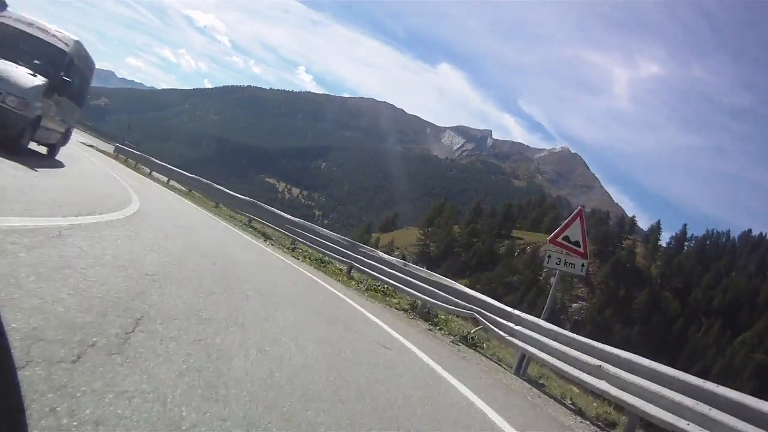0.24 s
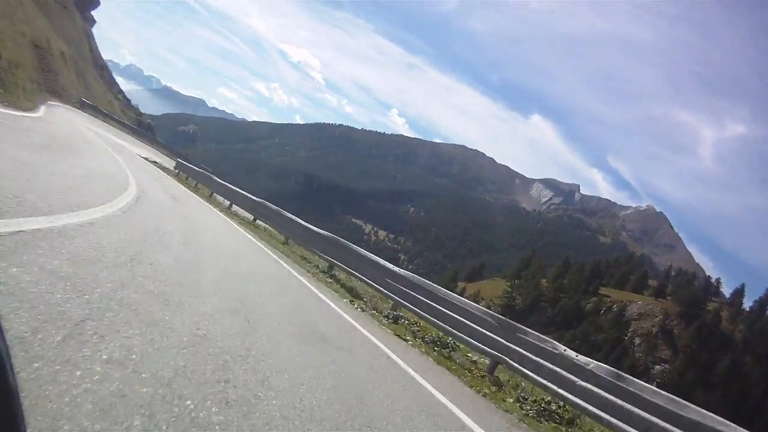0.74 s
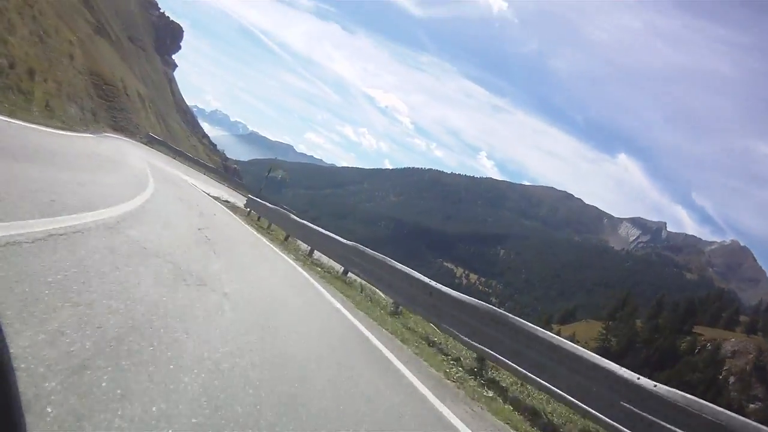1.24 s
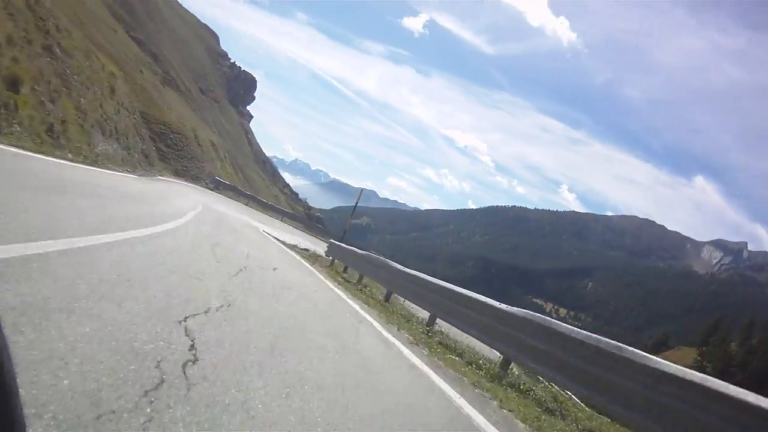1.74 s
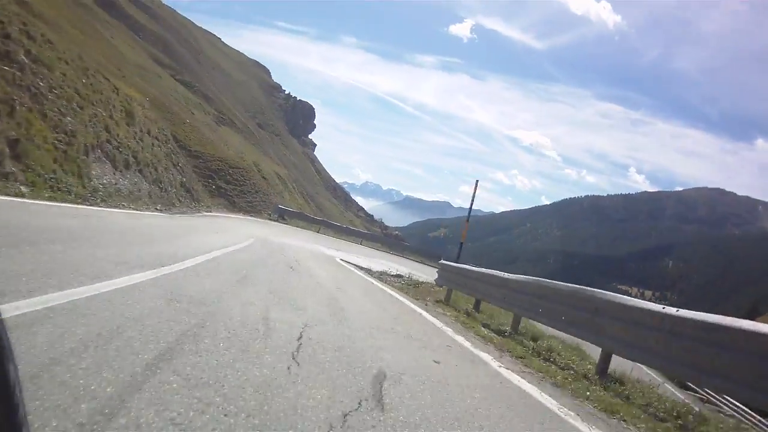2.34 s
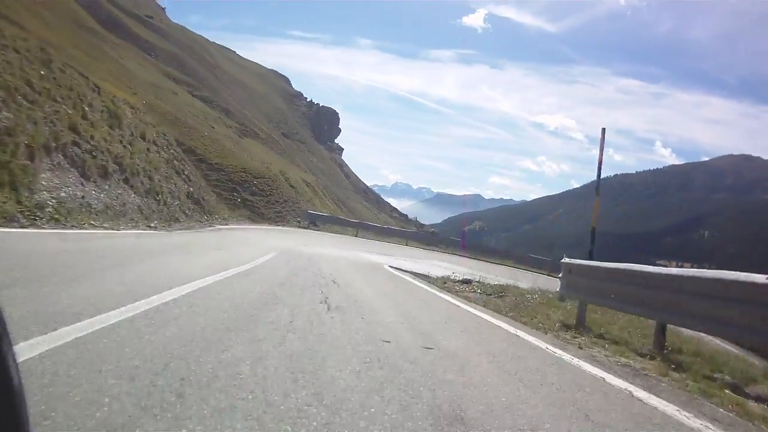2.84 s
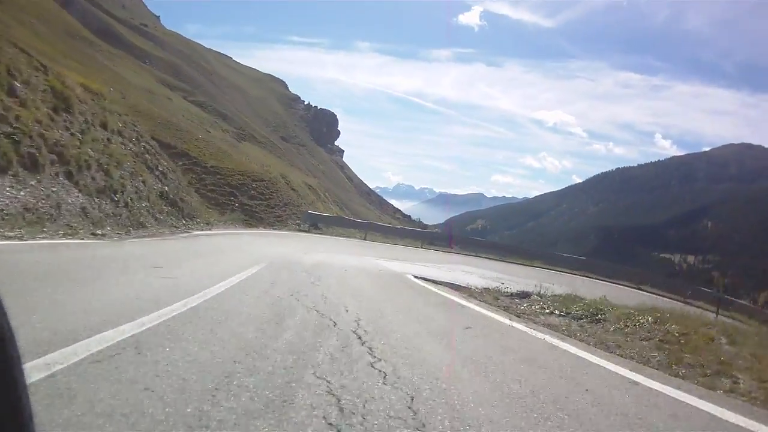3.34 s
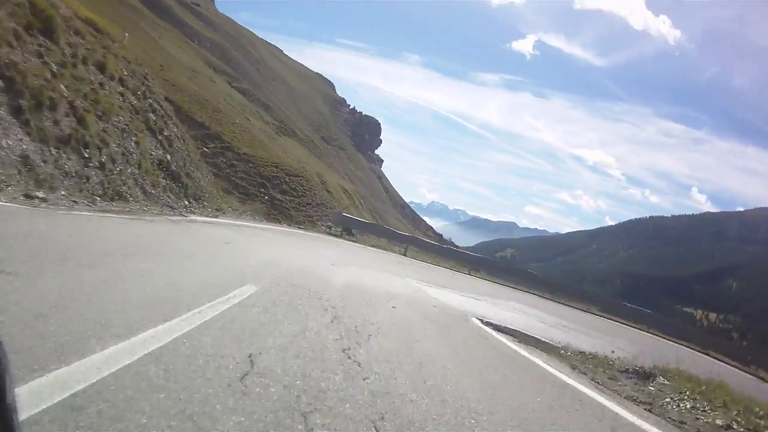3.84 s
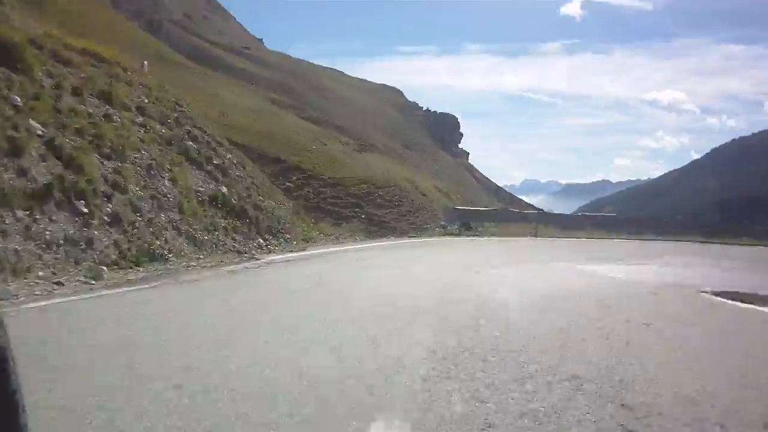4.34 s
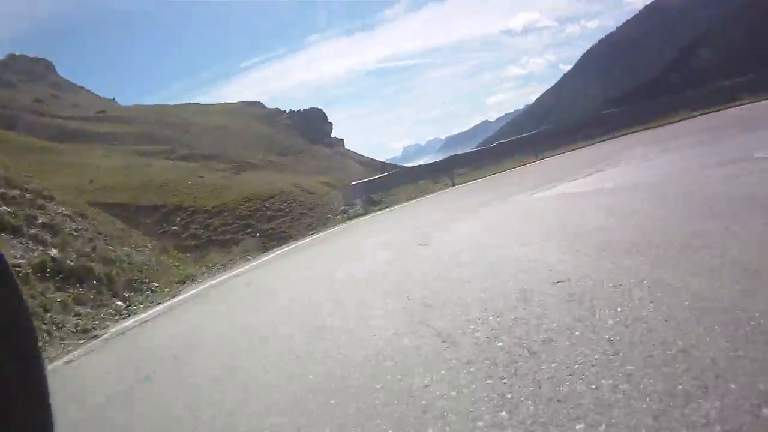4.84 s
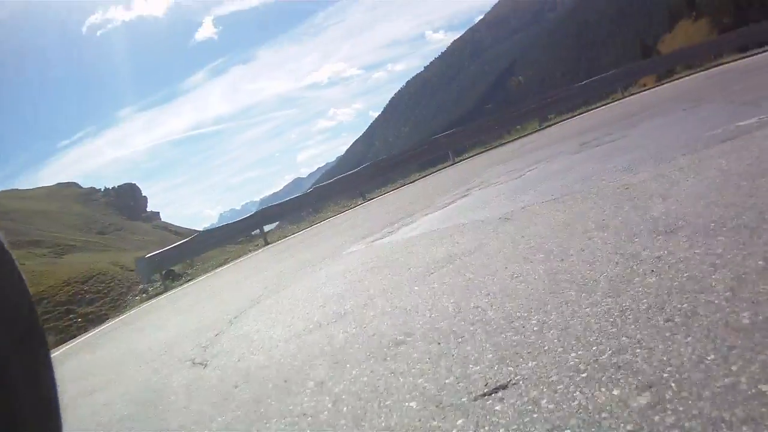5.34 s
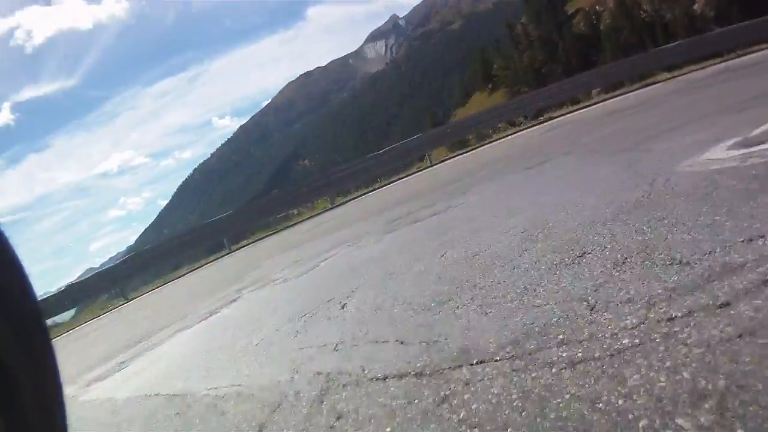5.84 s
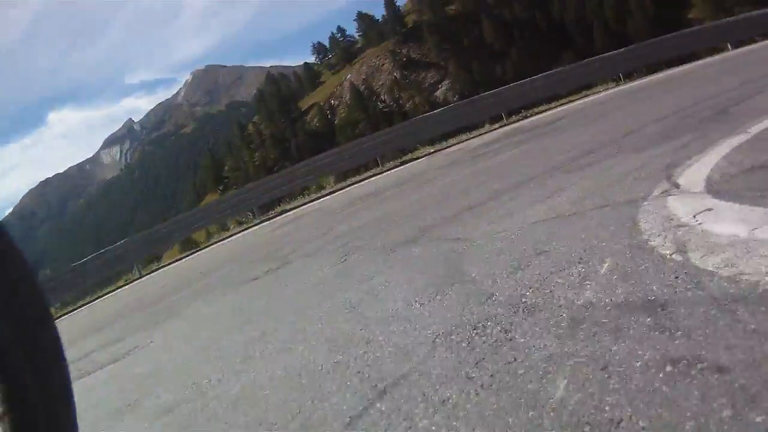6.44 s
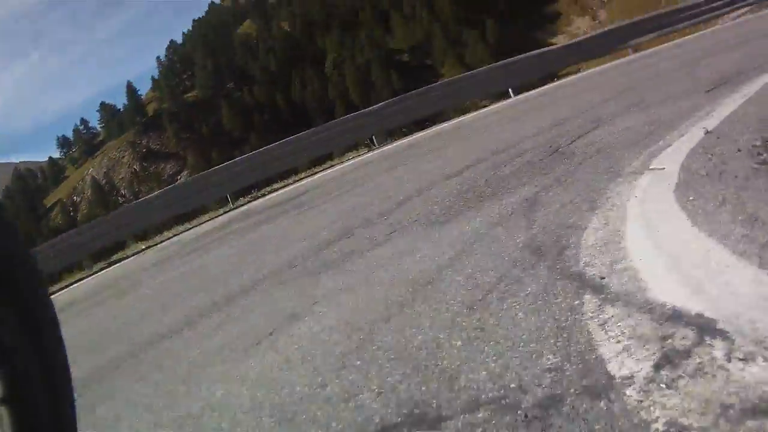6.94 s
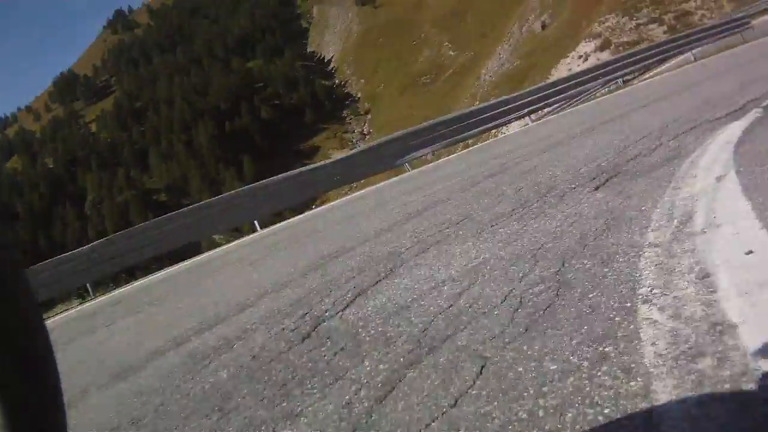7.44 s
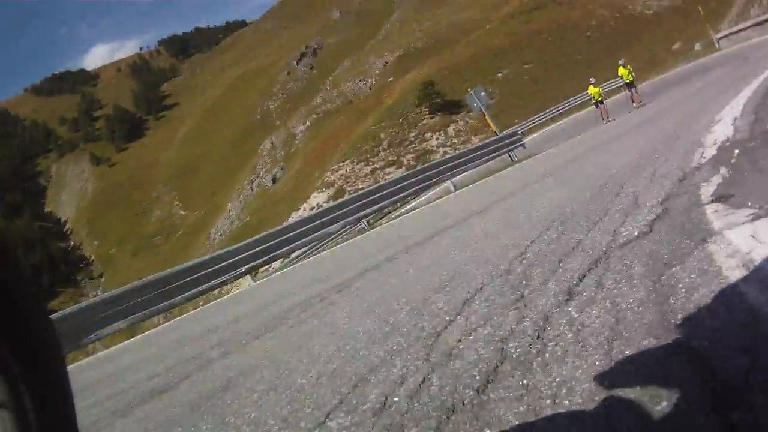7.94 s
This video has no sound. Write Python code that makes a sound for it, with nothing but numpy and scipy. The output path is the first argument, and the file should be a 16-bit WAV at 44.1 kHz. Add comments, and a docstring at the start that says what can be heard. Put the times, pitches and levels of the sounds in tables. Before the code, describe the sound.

Close, bassy motorcycle sound from a microphone mounted on the bike outdoors. A steady twin throb with gear whine and mechanical clatter is joined by a passing van's tyre rush. One brief rev flare follows, then a long descending deceleration into separate low thuds. Wind and road noise gradually ease as the bike slows, before a light throttle and a final rattly pull.

```python
"""A twin-cylinder motorcycle throbs on board, and at once a van sweeps past the other way.
The rider blips the throttle for a downshift, engine-brakes to a low chug, then opens up again.
Crank-locked pulses, noise puffs and shaft tones, shaped by resonances, make the engine.
Filtered noise makes the wind, the tyres and the loose fittings; the van adds a sagging drone."""
import sys
import numpy as np
from scipy import signal
from scipy.io import wavfile
from scipy.ndimage import map_coordinates

SR = 44100
rng = np.random.default_rng(int(sys.argv[2]) if len(sys.argv) > 2 else 0)


def output_pcm(signal):
    """Save a mono or channel-first signal as 16-bit PCM at the path in sys.argv[1].

    Samples are clipped to [-1, 1] before scaling.
    """
    pcm = np.clip(np.atleast_2d(signal).T, -1, 1) * 32767
    wavfile.write(sys.argv[1], SR, np.round(pcm).astype(np.int16))


N = 361619
TIME = np.arange(N) / SR


def amp(db):
    """Decibels to gain."""
    return 10 ** (np.asarray(db) / 20)


def unit(x):
    """Scales to rms 1."""
    return x / np.sqrt(np.mean(x ** 2) + 1e-20)


def curves(table):
    """The columns of a time table, drawn as straight lines at every sample."""
    times_s, *columns = np.transpose(table)
    return [np.interp(TIME, times_s, column) for column in columns]


def held(events, attack_s, release_s):
    """Each event rises to its strength, holds for its length and dies away."""
    out = np.zeros(N)
    for start_s, length_s, strength in events:
        age = TIME - start_s
        rise = np.clip(age / attack_s, 0, 1)
        fall = np.exp(-np.maximum(age - length_s, 0) / release_s)
        out += strength * rise * fall
    return out


def response(points, hz):
    """Gain of a spectrum at the given frequencies, in dB along log frequency."""
    f, db = np.transpose(points)
    return amp(np.interp(np.log(hz + 1), np.log(f + 1), db))


def colour(x, points, size=16384):
    """Causal filter with the given spectrum, scaled to rms 1: it rings after each blow."""
    log_gain = np.log(response(points, abs(np.fft.fftfreq(size, 1 / SR))))
    # the Hilbert transform supplies the minimum phase
    ring = np.fft.ifft(np.exp(np.conj(signal.hilbert(log_gain)))).real
    # the end of the sound leads in, so the filter is already ringing at the start
    led_in = np.r_[x[-size:], x]
    return unit(signal.fftconvolve(led_in, ring[:size // 2])[size:size + N])


def noise():
    """White noise."""
    return rng.standard_normal(N)


def wander(hz):
    """Smooth chance of rms 1 that changes about hz times a second."""
    knots = rng.standard_normal(4096)
    return unit(map_coordinates(knots, [TIME * hz], order=2, mode="wrap"))


def strokes(turns, lag, spread_db):
    """One impulse per turn, each of its own size; every second one comes late by lag turns."""
    out = np.zeros(N)
    for offset in (0, 1 + lag):
        at = np.flatnonzero(np.diff(np.floor((turns - offset) / 2)) > 0)
        out[at] += amp(spread_db * rng.standard_normal(1024)[:len(at)])
    return out


def puffs(blows, decay_s, steady):
    """Noise that flares with each blow and dies away above a steady share."""
    flare = signal.lfilter([1], [1, -np.exp(-1 / (SR * decay_s))], blows)
    return unit((unit(flare) + steady) * noise())


# spectra of the wind and the tyre roar: (f/Hz, level/dB)
WIND_SPECTRUM = [(3, -1.5), (8, -1.5), (16, -4.5), (30, -17.5), (60, -16), (120, -30), (300, -44.5),
                 (1000, -95)]
TYRE_SPECTRUM = [(100, -6), (400, -5.5), (700, -11.5), (1000, -22), (2000, -33.5), (5000, -64.5)]
# gusts on the microphone: (t/s, half length/s, level/dB)
GUSTS = [(0.747, 0.04, -13), (1.754, 0.066, -8), (1.975, 0.12, -14.5), (2.831, 0.073, -16),
         (4.196, 0.19, -17.5), (4.95, 0.029, -20), (8.082, .06, -22.5)]
BUFFET_LIMIT = 0.5  # sample amplitude


def wind_and_road(wind_db, tyres_db):
    """Lumpy wind and tyre roar fade from their first level to their last; gusts ride on top."""
    gusts = sum(amp(db) * np.exp(-((TIME - s) / half_s) ** 2) for s, half_s, db in GUSTS)
    airflow = np.hypot(amp(np.linspace(*wind_db, N)), gusts)
    buffet = airflow * amp(1.3 * wander(9.8)) * colour(noise(), WIND_SPECTRUM)
    roar_db = np.linspace(*tyres_db, N) + 0.27 * wander(12)
    roar = amp(roar_db) * colour(noise(), TYRE_SPECTRUM)
    # the hardest buffets saturate softly
    return BUFFET_LIMIT * np.tanh(buffet / BUFFET_LIMIT) + roar


# spectra of the van's tyre roar and of its hiss as it comes head-on: (f/Hz, level/dB)
VAN_ROAR_SPECTRUM = [(200, 7.5), (600, 4.5), (950, -7), (1400, -8), (2000, -20.5), (2900, -24.5),
                     (3600, -27), (6000, -39), (15000, -60)]
VAN_HISS_SPECTRUM = [(300, 7), (400, 13), (900, -10), (1600, -8), (2400, 1), (3400, -9), (4600, -5),
                     (6300, -13), (9000, -36)]


def van(nearest_s, passing_s, tyres_db, drone_hz, drone_db):
    """An oncoming van: tyre hiss swells with nearness, the drone sags as it goes by."""
    along = (TIME - nearest_s) / passing_s
    nearness = 1 / np.hypot(1, along)
    # runs from -1 ahead, through 0 alongside, to 1 behind
    bearing = along * nearness
    angle = 2 * np.pi * np.cumsum(drone_hz * (1 - 0.0469 * bearing)) / SR
    drone_swell = np.exp(-((TIME - 0.8) / 0.49) ** 2)
    drone = (np.cos(angle) + amp(-6.5) * np.cos(2 * angle)) * drone_swell
    # the road's reflection favours one band of the hiss, which climbs as the van goes by
    band = colour(noise(), [(1, 6), (400, 2), (800, -6), (1700, -32), (6000, -74)])
    sweep_hz = 2720 + 360 * bearing
    swish = unit(band * np.cos(2 * np.pi * np.cumsum(sweep_hz) / SR))
    # the hiss faces forwards; the tyres throw most of their roar backwards, so it peaks later
    hiss = colour(noise(), VAN_HISS_SPECTRUM) * nearness * (1 - bearing) / 2
    roar = colour(noise(), VAN_ROAR_SPECTRUM) / (1 + (along - 0.65) ** 2)
    tyres = amp(tyres_db) * roar + amp(-50.5) * hiss + amp(-56.5) * nearness ** 4 * swish
    return tyres + amp(drone_db) * drone


# small rattles of the fittings: (t/s, ring f/Hz, level/dB, 60 dB decay/s)
RATTLES = [(1.26, 3100, -64, .12), (1.764, 4930, -50, 0.026), (7.812, 4474, -55.5, 0.055)]


def rattles():
    """Loose fittings buzz briefly: noise around each one's own pitch, decaying from a quick onset."""
    out = np.zeros(N)
    for s, hz, db, t60 in RATTLES:
        age = np.maximum(TIME - s, 0)
        spectrum = [(hz / 2, -34), (hz * 0.91, -17), (hz, 0), (hz * 0.89, -19), (hz * 2, -42)]
        onset = 1 - np.exp(-age / 0.0012)
        out += onset * amp(db - 60 * age / t60) * colour(noise(), spectrum)
    return out


# Engine level laws: (level/dB at cruising revs, dB per octave of revs, dB added by full throttle,
# dB added by full engine braking)
DRIVE_LEVEL = (-48.5, 6.5, -7, 9)
# multiples of crank speed before and after the downshift
SHIFT_S, DRIVE_HIGH_GEAR, DRIVE_LOW_GEAR = 1.8, 5.7, 4.68


def final_drive(hz, level_db):
    """A hum and its octave follow the crank at a ratio that drops with the downshift."""
    ratio = np.where(TIME < SHIFT_S, DRIVE_HIGH_GEAR, DRIVE_LOW_GEAR)
    angle = 2 * np.pi * np.cumsum(hz * ratio) / SR
    hum = unit(np.cos(angle) + amp(-10) * np.cos(2 * angle))
    return amp(level_db + 2 * wander(6)) * hum


# resonances of the engine casings, which also shape the gear tones: (f/Hz, level/dB)
CASING_SPECTRUM = [(300, -18.5), (700, -6.5), (1050, -10), (1270, 0.5), (1480, -2), (1570, -13.5),
                   (1625, -6.5), (1750, -24), (2100, -12.5), (2600, -33), (3000, -36.5), (3150, -25),
                   (3330, -27), (8000, -42.5)]
# the high mode kept ringing by gear chatter: (f/Hz, level/dB)
CHATTER_SPECTRUM = [(2600, -41), (3020, -8), (3150, 4), (3270, -26), (3700, -40.5), (8000, -55)]
# gear tooth tones: (multiple of crank speed, level/dB)
GEAR_ORDERS = [(24, -4.5), (26, 0), (27, -3), (30, -7), (33, 0), (38, -6), (40, -4), (42, -5)]
# level law of the gears, columns as for the final drive
WHINE_LEVEL = (-59.5, 2.5, .3, 7)


def gears(turns, hz, level_db):
    """Tooth tones swell through the casing resonances; their chatter keeps one high mode ringing."""
    teeth = np.zeros(N)
    for order, db in GEAR_ORDERS:
        backlash = 0.2 * wander(22)  # radians
        swell = amp(db + 2 * wander(5)) * response(CASING_SPECTRUM, order * hz) ** 1.6
        teeth += swell * np.cos(2 * np.pi * order * turns + backlash)
    chatter = colour(noise(), CHATTER_SPECTRUM)
    return amp(level_db) * (teeth + amp(-19.5) * chatter)


# spectrum of the valve ticks: (f/Hz, level/dB)
VALVE_SPECTRUM = [(900, -6.5), (1700, 6.5), (2200, 2), (2500, -1.5), (2900, -1.5), (3150, 1), (3400, -9.5),
                  (3850, -1), (4150, 2.5), (4500, -13.5), (5000, -1.5), (5800, -13), (6300, -11.5),
                  (7200, -30), (15000, -27)]
# level laws of piston clatter and valve rasp, columns as for the final drive
CLATTER_LEVEL = (-53.5, 7.5, 6.5, 4)
RASP_LEVEL = (-61, 14, -0.5, 2.4)


def mechanics(turns, clatter_db, rasp_db):
    """Noise bursts: pistons knock in the casings once a turn and valves tick twice a turn."""
    piston_blows = strokes(turns, lag=0.061, spread_db=3.5)
    valve_blows = strokes(2 * turns, lag=0.18, spread_db=1.5)
    knocks = colour(puffs(piston_blows, decay_s=0.004, steady=3.5), CASING_SPECTRUM)
    ticks = colour(puffs(valve_blows, decay_s=0.0034, steady=5.1), VALVE_SPECTRUM)
    return amp(clatter_db) * knocks + amp(rasp_db) * ticks


# spectrum of the airbox: (f/Hz, level/dB)
AIRBOX_SPECTRUM = [(20, 0.5), (55, -21.5), (80, -2), (108, -0.5), (135, -8), (175, -14), (240, -26.5),
                   (600, -40.5), (3000, -88)]
# level law of the airbox, columns as for the final drive
AIRBOX_LEVEL = (-42.5, -12, 8, 3)


def airbox(turns, level_db):
    """The two pistons pump in quick succession: a soft double thud in the airbox each turn."""
    first = strokes(turns, lag=0.018, spread_db=3.0)
    second = strokes(turns - 0.28, lag=0.022, spread_db=4.0)
    thuds = first + second
    flow = unit(thuds - thuds.mean()) + 0.82 * puffs(thuds, decay_s=0.017, steady=1)
    return amp(level_db) * colour(flow, AIRBOX_SPECTRUM)


# growl of the intake: (multiple of crank speed, level/dB)
INTAKE_ORDERS = [(3, 3.5), (4, -.5), (5, -3), (7, -13)]
INTAKE_DB = -32  # gain at full throttle


def intake(turns, throttle):
    """The open throttle lets out a growl of low shaft orders."""
    growl = np.zeros(N)
    for order, db in INTAKE_ORDERS:
        growl += amp(db) * np.cos(2 * np.pi * (order * turns + rng.random()))
    return amp(INTAKE_DB) * throttle * np.sqrt(2) * growl


# the mount resonates with the twice-a-turn boom: (f/Hz, level/dB)
MOUNT_RESPONSE = [(52, -0.5), (64, -4.5), (76, 0.5), (87, 1.5), (100, -1.5), (118, -2), (135, -8)]
# level laws of the once- and twice-a-turn shakes, columns as for the final drive
SHAKE_LEVEL = (-28.5, 7, 7, 4)
BOOM_LEVEL = (-30.5, 9, 7.5, 9)


def shake(turns, hz, shake_db, boom_db):
    """The pistons shake the bike once and twice a turn."""
    angle = 2 * np.pi * turns
    boom = amp(boom_db) * response(MOUNT_RESPONSE, 2 * hz) * np.cos(2 * angle)
    return np.sqrt(2) * (amp(shake_db) * np.cos(angle) + boom)


# resonances of the exhaust pipe and of the frame: (f/Hz, level/dB)
PIPE_SPECTRUM = [(20, -44), (55, -34), (80, -3), (115, -5), (145, 0), (185, -2.5), (225, -1), (280, -4.5),
                 (350, -9), (470, -8), (620, -18), (780, -21.5), (1000, -32.5), (2000, -57)]
FRAME_RESPONSE = [(70, 11), (105, 6.5), (128, 0.5), (152, 9), (180, -1), (200, -2.5), (222, 4), (245, 1.5),
                  (265, 3.5), (320, 0), (385, -13.5), (425, -5), (460, 1.5), (520, -9.5), (720, -8),
                  (1100, -17.5)]
# shaft orders humming in the frame: (multiple of crank speed, level/dB)
FRAME_ORDERS = [(2.5, -4), (3, 2), (4, -2), (4.5, -3), (5, 1), (6, 2), (7, -2), (8, -1.5), (9, 2), (10, -4),
                (11, -2), (12, -3), (13, -5), (14, -4), (15, -3), (16.5, -6), (17, -5), (19, -5), (20, -7)]
# level laws of the exhaust and the frame hum, columns as for the final drive
EXHAUST_LEVEL = (-38, 8.5, 10, 0)
HUM_LEVEL = (-38, 9, 2.5, 6)


def exhaust(turns, hz, pipe_db, hum_db):
    """Firing pulses and their gas noise ring the pipe; shaft orders hum in the frame."""
    firing = strokes(turns, lag=0.012, spread_db=0.0)
    beats = colour(firing - firing.mean(), PIPE_SPECTRUM + [(6000, -72)])
    gas = colour(puffs(firing, decay_s=0.02, steady=0.52), PIPE_SPECTRUM)
    # each order swells as it slides through a resonance of the frame
    hum = np.zeros(N)
    for order, db in FRAME_ORDERS:
        angle = 2 * np.pi * order * turns + 0.25 * wander(6)
        swell = amp(db + 1.3 * wander(3.14)) * response(FRAME_RESPONSE, order * hz)
        hum += swell * np.cos(angle)
    return amp(pipe_db) * unit(gas + amp(-13.0) * beats) + amp(hum_db) * unit(hum)


# crank speed: (t/s, f/Hz in turns per second)
CRANK = [(0.0, 45.4), (0.68, 43.17), (0.77, 44.1), (0.98, 43.04), (1.21, 45.77), (1.32, 43.16),
         (1.57, 43.44), (1.71, 64.03), (1.76, 67.77), (1.98, 48.35), (2.01, 47.81), (2.1, 52.26),
         (2.74, 47.3), (3.63, 43.85), (4.22, 39.14), (4.63, 34.37), (4.93, 32.74), (5.11, 34.32),
         (5.39, 30.36), (5.75, 30.22), (6.51, 25.6), (7.01, 26.7), (7.19, 28.36), (7.42, 26.47),
         (7.83, 26.8), (7.99, 30.31), (8.2, 30.4)]
# how hard the rear wheel drives the engine: (t/s, engine braking 0-1)
BRAKING = [(0, 0.67), (.7, 0.49), (1.2, 0.14), (1.95, 0.41), (2.12, 0.82), (3.75, 0.93), (4.25, 0.74),
           (4.6, 0.52), (5.9, 0.01)]
# twists of the throttle, for the downshift blip, a trickle in the bend and the drive out:
# (start t/s, length/s, opening 0-1)
THROTTLE = [(1.6, 0.099, 0.58), (6.85, 1.1, 0.26), (7.93, .3, 0.77)]
# load changes take up slack in the drive and the engine rattles harder:
# (start t/s, length/s, extra clatter level/dB, extra rasp level/dB)
SNATCHES = [(0, 0.28, 0, 1.5), (1.23, 0.068, 3.5, 4), (1.67, 0.15, 2.5, -1.5), (6.6, 0.038, 6, .5),
            (7.56, 0.044, 1, 4), (7.954, 0.068, 3, 11), (8.12, 0.081, 2.5, 6)]
THROTTLE_ATTACK_S, THROTTLE_RELEASE_S = 0.027, 0.022
SNATCH_ATTACK_S, SNATCH_RELEASE_S = 0.017, 0.009
CRUISE_HZ = 45  # crank turns per second


def scene():
    """Crank speed, throttle and engine braking drive the engine parts; van, wind and road join in."""
    hz, = curves(CRANK)
    braking, = curves(BRAKING)
    throttle = held(THROTTLE, THROTTLE_ATTACK_S, THROTTLE_RELEASE_S)
    start, length, *extras = zip(*SNATCHES)
    extra_clatter_db, extra_rasp_db = [
        held(zip(start, length, db), SNATCH_ATTACK_S, SNATCH_RELEASE_S) for db in extras]

    def level(law):
        """A part's level in dB as the bike is ridden."""
        cruise_db, octave_db, throttle_db, braking_db = law
        revs_db = cruise_db + octave_db * np.log2(hz / CRUISE_HZ)
        return revs_db + throttle_db * throttle + braking_db * braking

    # crank position, with a slight unevenness of speed
    turns = np.cumsum(hz * (1 + 0.0015 * wander(18))) / SR
    background = wind_and_road(wind_db=[-21.5, -27.5], tyres_db=[-44, -50]) + rattles()
    traffic = van(nearest_s=0.72, passing_s=0.17, tyres_db=-36, drone_hz=76, drone_db=-25.5)
    engine = final_drive(hz, level(DRIVE_LEVEL)) + gears(turns, hz, level(WHINE_LEVEL))
    engine += mechanics(turns, level(CLATTER_LEVEL) + extra_clatter_db, level(RASP_LEVEL) + extra_rasp_db)
    engine += airbox(turns, level(AIRBOX_LEVEL)) + intake(turns, throttle)
    engine += shake(turns, hz, level(SHAKE_LEVEL), level(BOOM_LEVEL))
    engine += exhaust(turns, hz, level(EXHAUST_LEVEL), level(HUM_LEVEL))
    return (background + traffic + engine)[None]


# spectrum of the recorder's hiss: (f/Hz, level/dB)
HISS_SPECTRUM = [(100, -0.068), (3000, -0.042), (8000, -.5), (15000, 0.23)]
EDGE_HZ = 15350  # top of the recorder's band


def record(dry):
    """The recorder adds hiss and a thin whistle, then limits the band."""
    hiss = amp(-64.0) * colour(noise(), HISS_SPECTRUM)
    whistle = amp(-84.0) * np.cos(2 * np.pi * 7865 * TIME + 1.2 * wander(40))
    soft_ends = signal.windows.tukey(N, 0.0015)
    low_pass = signal.firwin(511, EDGE_HZ, window=("kaiser", 9), fs=SR)
    return signal.oaconvolve(dry * soft_ends + hiss + whistle, low_pass[None], "same")


dry = scene()
out = record(dry)
output_pcm(out)
```